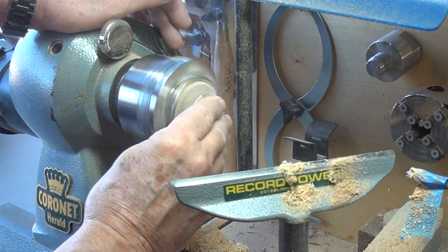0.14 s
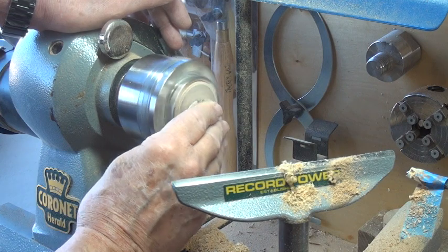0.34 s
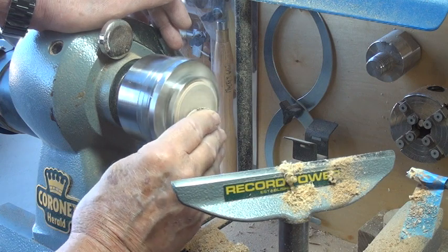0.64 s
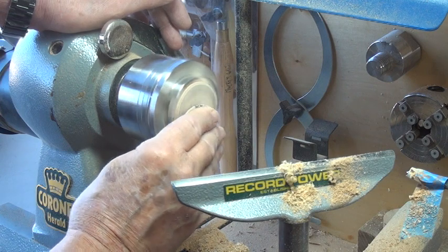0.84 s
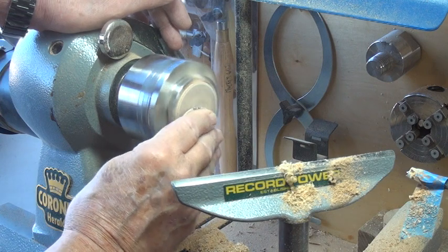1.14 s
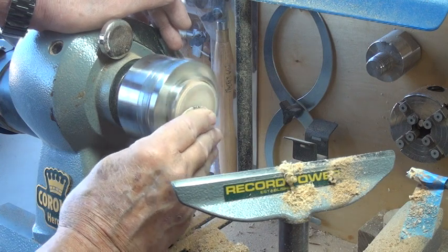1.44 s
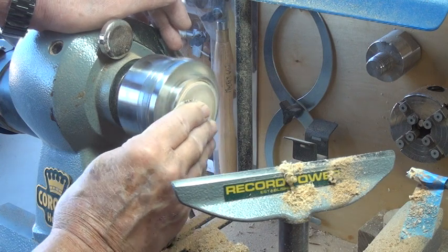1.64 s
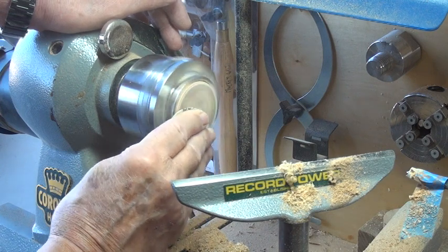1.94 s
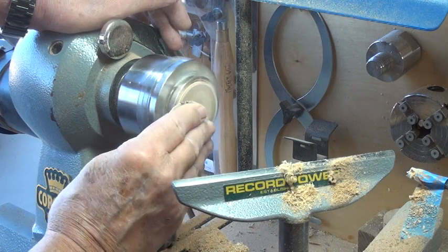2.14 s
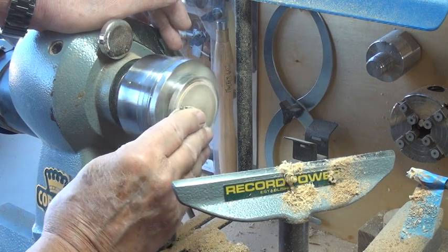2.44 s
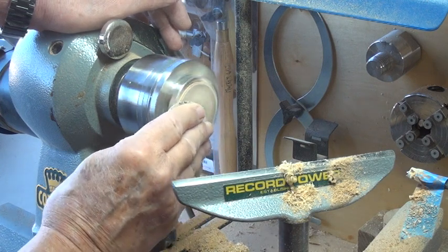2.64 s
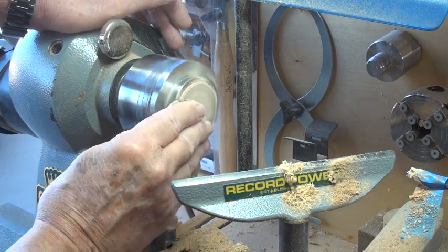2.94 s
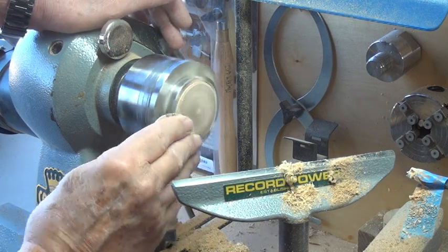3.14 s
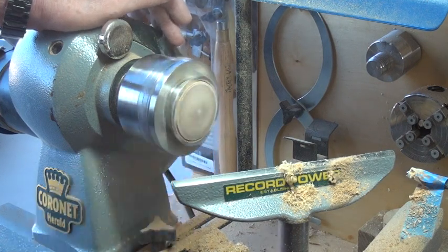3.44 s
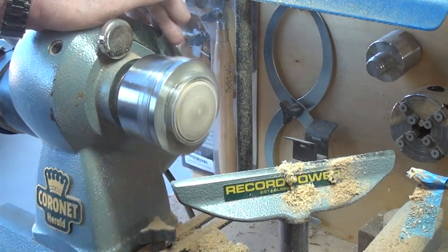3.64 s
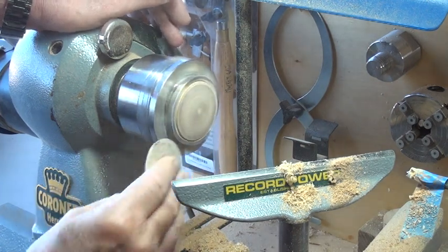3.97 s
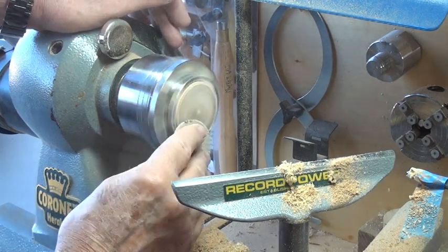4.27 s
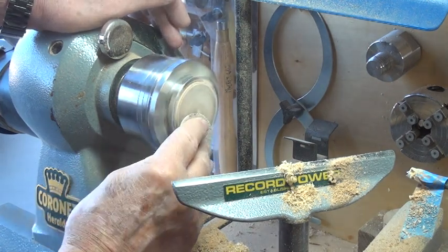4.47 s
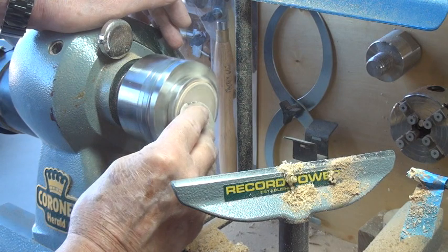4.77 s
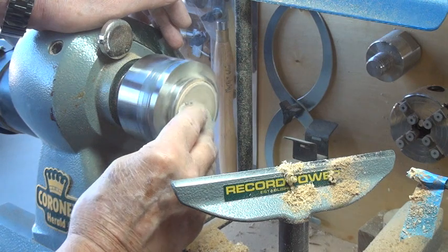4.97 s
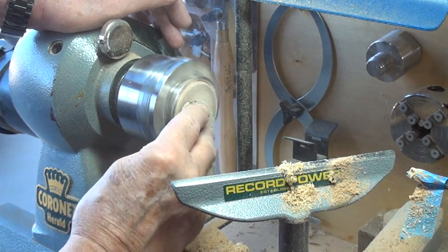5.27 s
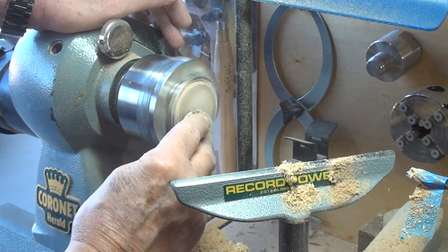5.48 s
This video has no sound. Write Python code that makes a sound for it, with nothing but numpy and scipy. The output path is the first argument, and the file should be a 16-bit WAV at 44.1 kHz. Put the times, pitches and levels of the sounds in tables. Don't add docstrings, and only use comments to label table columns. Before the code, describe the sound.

A wood lathe runs at constant speed throughout, heard close and almost centred, dry with little sense of room. Its motor makes a steady, slightly fluttering hum and belt buzz, with a broad airy fan rush, and a very thin, constant whine near 12 kHz. From 0 s abrasive paper is already on the small spinning wooden disc: a bright, dense, grainy hiss with a faint fast throb, swelling and easing as fingers press, and shifting between brighter and duller. Small rips and ticks of snagging paper cluster around 0.7-1.6 s, with a few near 1.9 and 2.6 s. A harder press and rougher catches come at about 3.1 s, then the paper lifts by 3.2 s. Only the motor is left until about 4.27 s, when the paper lands abruptly. The scraping resumes in a slightly different tone, with fainter snags until 4.65 s, and continues in gentle swells to the end at 5.6 s.

```python
import sys
import numpy as np
from scipy import signal
from scipy.fft import irfft
from scipy.io import wavfile
from scipy.ndimage import uniform_filter1d

SR = 44100
rng = np.random.default_rng(int(sys.argv[2]) if len(sys.argv) > 2 else 0)


def to_wav(sig):
    pcm = np.clip(np.atleast_2d(sig), -1, 1) * 32767
    pcm = np.round(pcm).astype(np.int16)
    wavfile.write(sys.argv[1], SR, pcm.T)


def volts(x):
    e = np.asarray(x, float) / 20
    return 10 ** e


N = 247401


def evened(x):
    return x / np.sqrt(np.mean(x ** 2) + 1e-20)


def read(points, hz):
    f, value = np.transpose(points)
    return np.interp(np.log(hz + 1), np.log(f + 1), value)


def peaks_db(modes, hz):
    return sum(db / (1 + (2 * (hz - f) / width) ** 2) for f, width, db in modes)


def drift(per_s, count):
    knot_s = np.arange(0, N / SR + 1, 1 / per_s)
    values = rng.standard_normal((count, len(knot_s)))
    return np.array([np.interp(np.arange(N) / SR, knot_s, row) for row in values])


def patches(shape, tall, long):
    field = rng.standard_normal(shape[::-1]).T
    return evened(uniform_filter1d(uniform_filter1d(field, tall, 0), long, 1))


# frequency [Hz], left minus right [dB].
LEAN_SPECTRUM = [(60, 0), (380, -.2), (690, -.7), (1300, -1.1), (2400, -.6), (8000, -.5), (14800, -.2)]
# frequency [Hz], side minus mid [dB].
SIDE_SPECTRUM = [(25, -14), (60, -22), (110, -26), (200, -34), (380, -17), (690, -20), (1280, -13.5),
                 (2360, -14), (4350, -14.5), (8030, -12.5), (14800, -17)]


def pair(middle, other, hz):
    side = other * volts(read(SIDE_SPECTRUM, hz))[:, None]
    lean = volts(read(LEAN_SPECTRUM, hz) / 2)[:, None]
    return np.array([(middle + side) * lean, (middle - side) / lean])


# time [s], speed [turns a second].
SHAFT_SPEED = [(0.0, 50.77), (0.6, 50.86), (1.3, 50.775), (2.1, 50.8), (3.1, 50.78), (3.45, 50.97),
               (3.7, 50.71), (4.6, 50.63), (4.8, 50.88), (5.61, 50.89)]


def shaft_turns():
    return np.cumsum(np.interp(np.arange(N) / SR, *np.transpose(SHAFT_SPEED))) / SR


def tones(rows, cycles, hz, waver_db, per_s, wander, sweep=0):
    out = np.zeros((2, N))
    wavers = drift(per_s, count=7)
    for k, (multiple, db) in enumerate(rows):
        start, sign = rng.random(), rng.choice([-1, 1])
        if sweep:
            start = -sweep * multiple ** 2
        angle = 2 * np.pi * (multiple * cycles + start) + wander * wavers[(k + 3) % 7]
        skew = sign * volts(read(SIDE_SPECTRUM, multiple * hz)) * np.array([[1], [-1]])
        size = np.sqrt(2) * volts(db + waver_db * wavers[k % 7])
        out += size * np.sin(angle + skew)
    return out


# multiple of shaft speed, level [dB].
SHAFT_ORDERS = [(1, -92.7), (2, -68.5), (3, -68.9), (4, -61.2), (5, -62.0), (6, -52.4), (10, -55.7),
                (11, -58.4), (12, -47), (13, -59), (15, -57.9), (16, -50.7), (17, -59.7), (18, -49.1),
                (22, -59.9), (24, -60.9), (30, -62.2), (32, -53.8), (46, -60.9), (48, -52.4), (64, -61.7),
                (92, -57.2), (93, -62.6), (97, -62.8), (98, -64.3), (143, -61.3), (144, -57.8),
                (145, -59.9), (146, -63.5), (196, -70.8)]
# multiple of shaft speed, level [dB].
BEARING_ORDERS = [(1.149, -83), (1.255, -73), (2.507, -79), (3.762, -70), (5.484, -60), (7.527, -62),
                  (19.93, -59), (20.7, -58), (21.085, -54), (24.764, -55), (25.37, -59)]


def shaft_hum():
    orders = [(k, db + .02 * k) for k, db in SHAFT_ORDERS + BEARING_ORDERS]
    return volts(0.45) * tones(orders, shaft_turns(), 50.8, waver_db=1.5, per_s=8, wander=.25)


# multiple of belt speed, level [dB].
BELT_ORDERS = [(10, -78.3), (15, -71.0), (16, -70.6), (18, -66.1), (19, -65.1), (20, -68.4), (22, -57.1),
               (28, -65.4), (35, -66.2), (38, -64.5), (40, -58.2), (42, -56.8), (43, -61.2), (45, -59.5),
               (47, -56.6), (50, -56.6), (51, -58.3), (52, -55.7), (53, -44.7), (54, -55), (56, -46.2),
               (57, -51.5), (58, -58.8), (59, -54.0), (60, -56.5), (66, -59.5), (69, -59.7), (71, -58.7),
               (114, -63.1), (117, -59.5)]


def belt_hum():
    belt_turns = .21686 * shaft_turns()
    return volts(0.2) * tones(BELT_ORDERS, belt_turns, 11.0, waver_db=1.1, per_s=4, wander=.15, sweep=.036)


# frequency [Hz], level [dB].
DRIVE_TONES = [(9938, -69), (10137, -72), (11090, -67), (11192, -70), (11396, -72), (11698, -68),
               (11951, -65), (12005, -40), (12053, -67), (12312, -72), (12613, -69), (12818, -58),
               (12920, -66), (13221, -66)]


def drive_whine():
    return tones(DRIVE_TONES, np.arange(N) / SR, 1, waver_db=0.2, per_s=29, wander=0.26)


# frequency [Hz], density [dB per Hz].
RUSH_SPECTRUM = [(25, -62), (45, -63), (130, -25), (292, -13), (350, -11.5), (600, -1), (704, -7.5),
                 (1410, -10), (1830, -11.5), (3150, -19), (7200, -20.5), (8600, -27.5), (13400, -27.5),
                 (15300, -35)]
# frequency [Hz], width [Hz], height [dB].
HOUSING_MODES = [(264, 40, 7), (556, 87, -2.5), (765, 30, 6.5), (1150, 91, 3.5), (1310, 81, 3.5),
                 (1824, 160, 8.5), (2808, 160, 12.5), (3400, 43, 7), (3960, 120, 8.5), (4510, 63, 4.5),
                 (5010, 95, 5), (6300, 350, 3.5), (7200, 160, 3), (8050, 240, 2), (9700, 200, -2),
                 (10100, 350, 1), (12100, 700, 4), (13200, 200, 0)]


def housing_db(hz):
    return read(RUSH_SPECTRUM, hz) + peaks_db(HOUSING_MODES, hz)


def shaft_rattle():
    orders = np.arange(1025)
    hz = orders * 50.8
    uneven_db = 3.0 * np.clip(rng.standard_normal(1025), -2, 1.5)
    z = volts(housing_db(hz) + uneven_db) * np.exp(2j * np.pi * rng.random((2, 1025)))
    weak = (orders > 18) & (orders < 285) & ~np.isin(orders, [k for k, _ in SHAFT_ORDERS])
    turn = irfft(pair(z[0][:, None], z[1][:, None], hz)[..., 0] * weak, 2048)
    at = shaft_turns() % 1 * 2048
    rattle = np.array([np.interp(at, np.arange(2049), np.append(c, c[0])) for c in turn])
    return volts(-43.5) * evened(rattle)


def fan_rush():
    hz = np.fft.rfftfreq(2048, 1 / SR)
    a, b, c, d = rng.standard_normal((N // 512 + 5, 1025, 4)).T
    colour = volts(housing_db(hz)[:, None] + 1.0 * patches(a.shape, 10, 8))
    z = pair(a + 1j * b, c + 1j * d, hz) * colour
    beat = 1 + 0.028 * np.cos(2 * np.pi * shaft_turns())
    return volts(-35.5) * beat * evened(signal.istft(z, nperseg=2048, noverlap=1536)[1][:, :N])


def motor():
    return shaft_hum() + belt_hum() + drive_whine() + shaft_rattle() + fan_rush()


def grit(per_s, uneven_db):
    size = volts(uneven_db * np.minimum(rng.exponential(1, (2, N)), 3.8))
    sign = rng.choice([-1, 1], (2, N))
    return evened(size * sign * (rng.random((2, N)) < per_s / SR))


# peak time [s], extra pressure [dB], length [s].
PRESSES = [(0.154, 2.5, .2), (0.85, 0, 0.25), (1.106, 1.5, .2), (1.46, 4, 0.29), (1.68, 1.5, 0.12),
           (1.883, 1, .08), (2.18, 2.5, 0.26), (2.57, 4.5, 0.16), (2.79, 1.5, 0.28), (3.08, 5, 0.087),
           (3.26, 2, 0.024), (4.275, 0.5, .04), (4.6, 2.5, 0.31), (4.987, 2.5, 0.12), (5.152, 3.5, 0.22),
           (5.442, 3.5, .25)]


def pushes_db(t):
    rise_share = 0.32
    return sum(db * np.exp(-((t - s) / (length * np.where(t < s, rise_share, 1 - rise_share))) ** 2)
               for s, db, length in PRESSES)


# frequency [Hz], level [dB].
GRIT_SPECTRUM = [(900, -26), (1800, -8), (2600, -2.5), (4300, 1), (7800, -0.5), (9000, 1.5), (11000, 1),
                 (13700, 1.5), (14300, 1), (14600, -23), (15100, -24.5)]
# frequency [Hz], width [Hz], height [dB].
GRIP_RINGS = [
    [(2810, 90, 6), (3550, 150, 6.5), (4480, 100, 4), (6720, 400, 4), (10900, 500, 1.5)],
    [(2050, 150, 7), (2450, 150, 5), (2800, 120, 4), (4000, 200, 3), (5150, 400, 5.5), (5500, 120, 4),
     (5900, 100, 4), (6500, 500, 3), (7350, 200, 4), (8150, 600, -4)],
]
# lands [s], lifts [s], resting pressure [dB].
TOUCHES = [
    (-0.1, 3.17, -42),
    (4.271, 5.8, -42.5),
]
# time [s], reach [0 midway, minus inward, plus to
REACH_CURVES = [
    [(0.0, 0.18), (0.3, -0.38), (0.45, -0.21), (0.76, 0.53), (1.05, 0.36), (1.9, -0.41), (2.62, -0.055),
     (2.87, -0.76), (3.15, -0.1)],
    [(4.27, -1.4), (4.45, -.7), (4.6, -0.13), (4.72, -0.4), (4.85, -0.0088), (5.3, -0.64), (5.61, -.2)],
]
# frequency [Hz], width [Hz].
ZONE_BANDS = [(3500, 2100), (5000, 530), (6600, 1980)]
# lift [dB], slope [dB per unit of reach], [dB per dB of push].
ZONE_GAINS = [(1.5, 7.5, 0.37), (2.3, 4, -0.08), (5, 2, -0.5)]


def sanding():
    hz, t, z = signal.stft(grit(per_s=30000, uneven_db=3.5), SR, nperseg=512, noverlap=384)
    power = np.zeros(z[0].shape)
    push_db = pushes_db(t)
    for (lands, lifts, rest_db), curve, rings in zip(TOUCHES, REACH_CURVES, GRIP_RINGS):
        away_db = 850 * np.maximum(lands - t, 0) + 174 * np.maximum(t - lifts, 0)
        reach = np.interp(t, *np.transpose(curve))
        zone_db = 0
        for (f, width), (db, per_reach_db, per_push) in zip(ZONE_BANDS, ZONE_GAINS):
            zone = np.exp(-(2 * (hz - f) / width) ** 4)[:, None]
            zone_db = zone_db + zone * (db + per_reach_db * reach + per_push * push_db)
        colour_db = (read(GRIT_SPECTRUM, hz) + peaks_db(rings, hz))[:, None]
        power += volts(colour_db + rest_db + push_db - away_db + zone_db) ** 2
    spindle = 2 * np.pi * .3 * np.interp(t, np.arange(N) / SR, shaft_turns())
    wobble = 0.27 * np.cos(spindle + 1.1) + 0.3 * np.cos(2 * spindle + 2.2) + 0.75 * np.cos(4 * spindle + 3.3)
    throb = np.maximum(1 + 0.082 * wobble, .1)
    shift_db = .9 * patches(power.shape, 3, 10)
    shift_db += 7.8 + 0.75 * patches((1, len(t)), 1, 4)
    z = pair(*z, hz) * np.sqrt(power) * volts(shift_db) * throb
    return signal.istft(z, SR, nperseg=512, noverlap=384)[1][:, :N]


# time [s], peak level [dB], ring frequency [Hz].
GRAIN_SNAGS = [(0.6674, -22, 6710), (0.7594, -15, 3600), (0.762, -22, 2800), (0.8294, -26, 2820),
               (0.9294, -24, 2840), (0.9614, -25, 6900), (1.0274, -16, 3400), (1.0877, -21, 6100),
               (1.093, -19, 2860), (1.394, -21, 6280), (1.417, -20, 6750), (1.425, -13, 5740),
               (1.425, -19, 3720), (1.4571, -17, 6800), (1.477, -16, 6560), (1.5514, -21, 2800),
               (1.5894, -20, 6970), (1.942, -18, 6030), (2.545, -26, 2900), (2.5694, -19, 6080),
               (2.598, -25, 3150), (3.079, -22, 2480), (3.0997, -19, 4500), (3.117, -12.5, 2630),
               (3.116, -18, 1400), (3.1597, -22, 2820), (4.2644, -35, 2430), (4.3894, -27, 6410),
               (4.4553, -25, 2800), (4.5244, -30, 6550), (4.6294, -23, 7040)]


def snags():
    out = np.zeros((2, N))
    t = np.arange(1500) / SR
    envelope = (1 - np.exp(-t / 0.0023)) * np.exp(-t / 0.0062)
    rip_band = signal.butter(2, [1100, 9000], "band", fs=SR)
    for s, db, hz in GRAIN_SNAGS:
        noise = rng.standard_normal((2, 1500))
        ring = signal.lfilter(*signal.iirpeak(hz, 8.0, SR), noise)
        rip = signal.lfilter(*rip_band, noise)
        middle, side = volts(db - 8.5) * (evened(ring) + 0.26 * evened(rip)) * envelope
        start = round((s - .003) * SR)
        out[:, start:][:, :1500] += middle + 0.24 * side * np.array([[1], [-1]])
    return out


def scene():
    return motor() + sanding() + snags()


# from [Hz], to [Hz], share of time blanked [0-1].
BLANKED_BANDS = [(13600, 14400, .168), (14400, 15100, .72), (15100, 22050, 1)]


def blank_top(x):
    hz, t, z = signal.stft(x, SR, nperseg=1024, noverlap=768)
    for low_hz, high_hz, share in BLANKED_BANDS:
        band = (hz > low_hz) & (hz <= high_hz)
        power = uniform_filter1d((abs(z[:, band]) ** 2).sum((0, 1)), size=6)
        z[:, band] *= power > np.quantile(power, share)
    return signal.istft(z, SR, nperseg=1024, noverlap=768)[1][:, :N]


def band_limit(x):
    return signal.sosfilt(signal.butter(12, 15100, fs=SR, output="sos"), x)


def record(dry):
    mix = blank_top(dry)
    return band_limit(mix)


dry = scene()
out = record(dry)
to_wav(out)
```